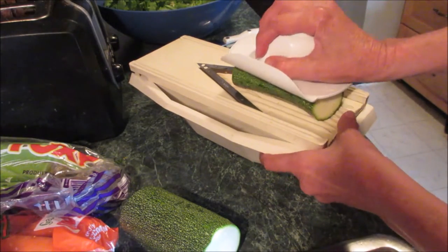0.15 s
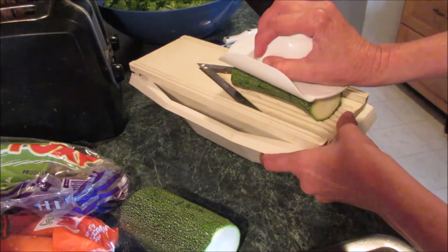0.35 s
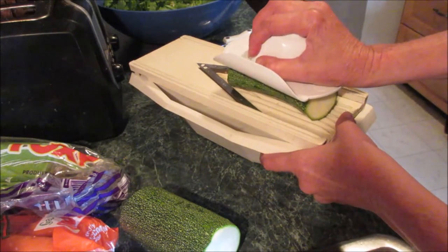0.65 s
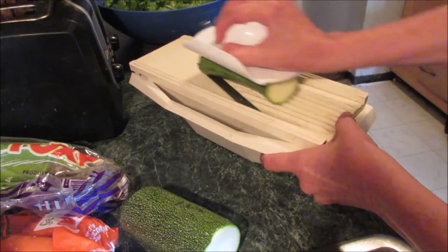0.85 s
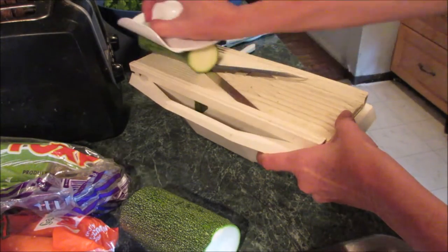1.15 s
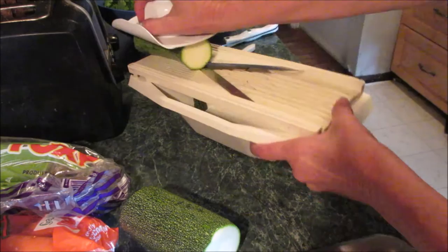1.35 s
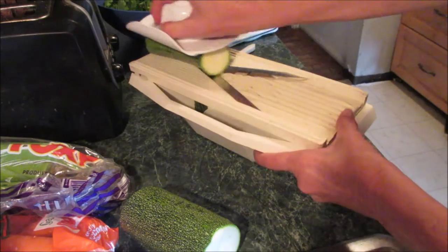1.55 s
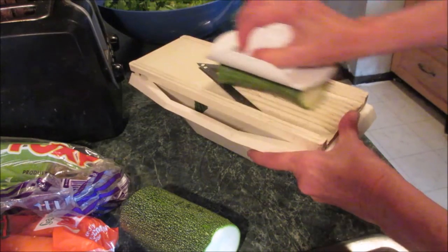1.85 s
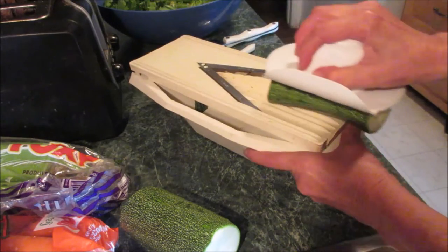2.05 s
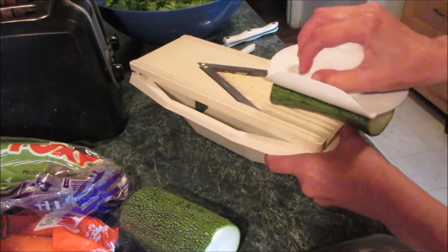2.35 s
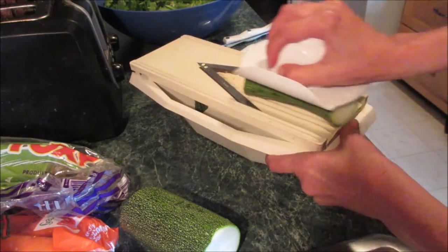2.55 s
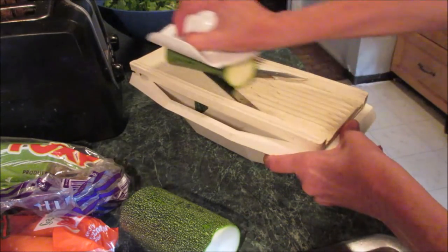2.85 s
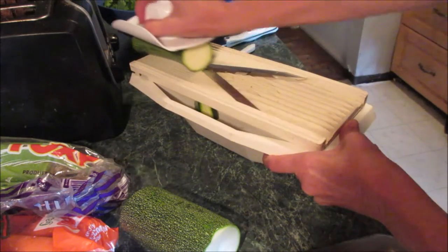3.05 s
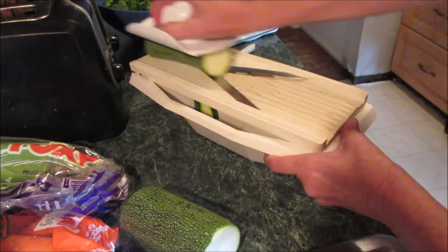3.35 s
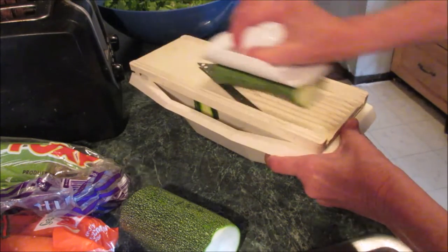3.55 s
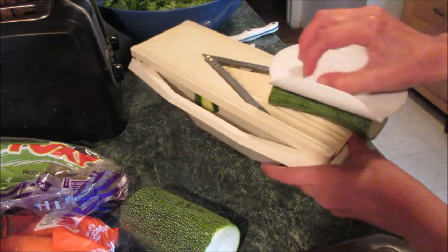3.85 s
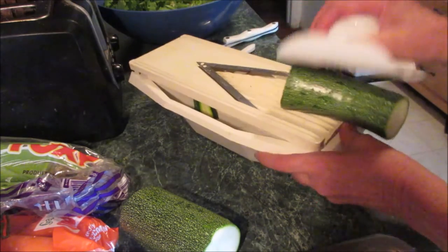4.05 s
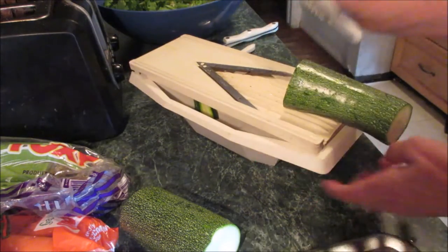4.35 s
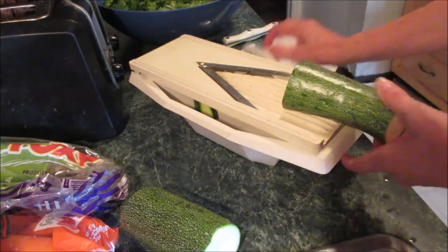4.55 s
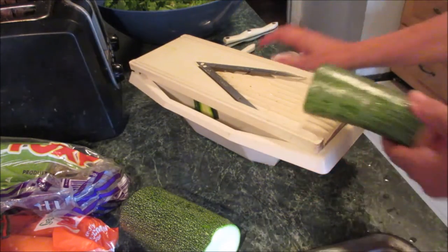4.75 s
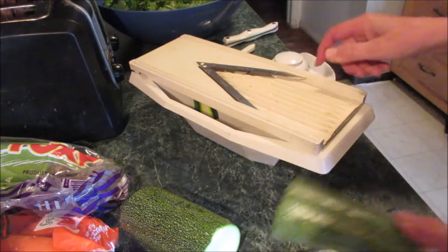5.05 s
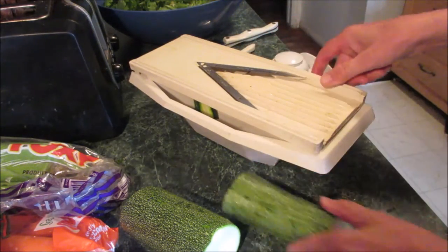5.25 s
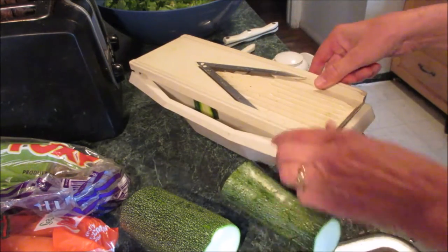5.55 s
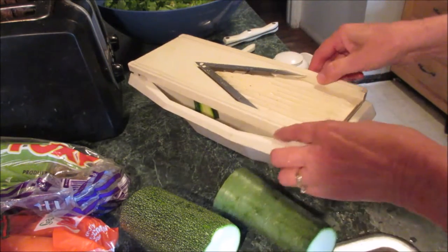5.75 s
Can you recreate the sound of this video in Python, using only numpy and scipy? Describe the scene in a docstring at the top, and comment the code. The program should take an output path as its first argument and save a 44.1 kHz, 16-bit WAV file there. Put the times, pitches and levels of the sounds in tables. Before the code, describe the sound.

Moist, raspy strokes slide over a ribbed slicer, with brief crackles, small squeaks and woody double knocks. After about four seconds comes the loudest clunk, then a hollow plastic rattle as the holder is put down. Quiet bumps and rubs end it. Close mono recording, short kitchen reverberation, low hum and room air beneath.

```python
"""A zucchini in a plastic food holder goes to and fro over a mandoline slicer on a kitchen counter.
First wet flesh swishes over the board (resonant friction noise), crunches through the V-blade (crackle bursts)
and knocks the slicer at the turn of a stroke (struck modes plus crack noise), amid short pitched noise puffs.
Then the slicer bumps down, the holder drops on the counter (struck modes) and hands shift things about.
Throughout, a fridge hums (wavering sines) in room air (shaped noise) over a steady faint hiss."""
import sys
import numpy as np
from scipy import signal
from scipy.fft import rfft, irfft
from scipy.io import wavfile

SR = 44100
rng = np.random.default_rng(int(sys.argv[2]) if len(sys.argv) > 2 else 0)


def bounce(signal):
    """Save signal as a 16-bit WAV file at the path given by the first command-line argument."""
    frames = np.transpose(np.atleast_2d(signal))
    limited = np.clip(frames, -1, 1)
    pcm = np.round(limited * 32767).astype(np.int16)
    wavfile.write(sys.argv[1], SR, pcm)


N = 260586
TIME_S = np.arange(N) / SR
DECAY_TIME_S = TIME_S[:SR // 2]   # for blows, bursts and the room tail


def from_db(db):
    """Decibels to gain."""
    return 10 ** (np.asarray(db) / 20)


def rms_one(x):
    """Scale to unit power."""
    return x / np.sqrt(np.mean(x ** 2) + 1e-20)


def attack_one(x):
    """Scale a blow to unit power over its first 8 ms."""
    return x / np.sqrt(np.mean(x[:SR // 125] ** 2) + 1e-20)


def at_hz(points, hz):
    """Read a table on a log-frequency axis."""
    freqs, values = np.transpose(points)
    return np.interp(np.log(np.maximum(hz, 1)), np.log(freqs), values)


def coloured(x, spectrum):
    """Weight a noise by a spectrum; rms 1."""
    hz = np.fft.rfftfreq(len(x), 1 / SR)
    return rms_one(irfft(rfft(x) * from_db(at_hz(spectrum, hz)), len(x)))


def drift(knots_per_s):
    """Random values joined by straight lines; rms 1."""
    knots = rng.standard_normal(4096)
    return rms_one(np.interp(TIME_S * knots_per_s, np.arange(len(knots)), knots))


def resonate(x, hz, width_hz):
    """Two-pole resonance, gain 1 on top."""
    r = np.exp(-np.pi * width_hz / SR)
    zeros = np.array([1, 0, -1]) * (1 - r * r) / 2
    poles = [1, -2 * r * np.cos(2 * np.pi * hz / SR), r * r]
    return signal.lfilter(zeros, poles, x)


def soften(x, hz):
    """Second-order low-pass: a longer contact takes the top off a blow."""
    return signal.sosfilt(signal.butter(2, min(hz, SR / 2 - 1), fs=SR, output="sos"), x)


def high_pass(x, hz, order):
    """Butterworth low cut."""
    return signal.sosfilt(signal.butter(order, hz, "high", fs=SR, output="sos"), x)


def add(out, s, sound):
    """Mix a sound in at time s."""
    start = int(s * SR)
    out[start:start + len(sound)] += sound[:N - start]


STROKE_SAG_DB_PER_S = 22   # the arm slows as the stroke goes on


def motion(table):
    """Strength of a set of slides: each swells, holds while slowly sagging, and fades."""
    power = np.zeros(N)
    for s, hold_s, db, swell_s, fade_s in table:
        before_s = np.minimum(TIME_S - s, 0)
        after_s = np.maximum(TIME_S - s - hold_s, 0)
        ramps = np.exp(before_s / swell_s - after_s / fade_s)
        sagging_db = db - STROKE_SAG_DB_PER_S * np.clip(TIME_S - s, 0, hold_s)
        power += (ramps * from_db(sagging_db)) ** 2
    return np.sqrt(power)


def grains(per_s, spread_db, smooth):
    """Tiny slips and bursting cells of uneven size over a smooth film of juice."""
    sizes = from_db(spread_db * np.minimum(rng.exponential(1, N), 4)) * rng.choice([-1, 1], N)
    slips = rms_one(sizes * (rng.random(N) < per_s / SR))
    return rms_one(slips + smooth * rng.standard_normal(N))


def through(x, resonances, patchy_db):
    """Parallel resonances, each swelling and fading as the contact moves over it; rms 1."""
    total = np.zeros(N)
    for k, (hz, width_hz, db) in enumerate(resonances):
        gain = from_db(db + patchy_db * drift(knots_per_s=45))
        total += gain * resonate(x, hz, width_hz) * (-1) ** k   # alternate polarity
    return rms_one(total)


# wet zucchini over the board: (t at full speed/s, hold/s, effort level/dB, swell/s, fade/s)
STROKES = [(.28, 0.11, -66.5, 0.21, 0.17), (.98, 0.19, -45, .1, 0.081), (1.66, 0.46, -56, 0.11, 0.25),
           (2.88, 0.09, -42, 0.11, 0.11), (3.365, 0.29, -48, 0.044, 0.091)]
# dry rubs of hands, holder and peel: (t/s, hold/s, effort level/dB, swell/s, fade/s)
RUBS = [(.84, 0.046, -54, 0.052, 0.024), (1.225, 0.048, -56.5, .01, .04),
        (1.865, .035, -48, 0.0075, 0.0085), (1.96, 0.012, -49.5, 0.021, 0.0097),
        (2.07, .03, -60.5, .02, 0.085), (2.53, 0.069, -58.5, 0.06, 0.041), (3.345, 0.055, -47, 0.012, .015),
        (3.9, 0.23, -62.5, 0.27, 0.067), (4.38, 0.053, -53, 0.045, 0.051), (5.745, .015, -53, 0.14, .025)]
# resonances of the rubbed board: (f/Hz, width/Hz, relative level/dB)
BOARD = [(104, 24.6, 8.5), (245.5, 46, 2), (399, 31, 5), (502, 125, 0.5), (703, 218, 2), (1078, 165, 0),
         (1510, 960, -12.5)]
# narrow resonances of blade and frame: (f/Hz, width/Hz, relative level/dB)
BLADE = [(2304, 110, 3.5), (3260, 130, -0.5), (4900, 320, 3), (7340, 400, -0.5)]
# spectrum of the friction hiss: (f/Hz, relative level/dB)
HISS = [(700, -22), (1300, -3), (2300, 3.5), (3200, 1), (4600, 0.5), (6000, -8.5), (8000, -8), (15000, -25)]
# spectrum of the wet top sheen: (f/Hz, relative level/dB)
SHEEN = [(3500, -48), (5500, -1.5), (7300, -3.5), (9000, -1.5), (12000, -0.5), (15000, -8.5)]
FULL_DB, FLOOR_DB = -43, -69   # effort level taken as 1; steady faint hiss under everything
BOARD_DB, BOARD_FOLLOWS = -45.5, 0.64   # board level at effort 1; its share of the swing in dB
HISS_DB, BLADE_DB = -3.5, -8   # all hiss re effort level; blade within it
SHEEN_DB, SHEEN_FOLLOWS = -6, 1.16   # within the hiss at effort 1; follows wet strokes and floor
JUDDER_DB, JUDDER_KNOTS_PER_S = 1.4, 28   # the grip catches and eases
RASP_DB, RASP_KNOTS_PER_S = 1.64, 180   # the skin catches on the ribs of the board


def sliding():
    """Friction shakes board and blade and hisses at the wet contact; wet and dry effort share one flutter."""
    judder = from_db(JUDDER_DB * drift(JUDDER_KNOTS_PER_S) - FULL_DB)
    wet = judder * np.hypot(motion(STROKES), from_db(FLOOR_DB))
    effort = np.hypot(wet, judder * motion(RUBS))
    friction = grains(per_s=5000, spread_db=3, smooth=.8)
    board = rms_one(soften(through(friction, BOARD, patchy_db=2.5), hz=2500))
    blade = through(rng.standard_normal(N), BLADE, patchy_db=5)
    rasp = effort * from_db(RASP_DB * drift(RASP_KNOTS_PER_S)) * coloured(friction, HISS)
    sheen = from_db(SHEEN_DB) * wet ** SHEEN_FOLLOWS * coloured(friction, SHEEN)
    hiss = rasp + from_db(BLADE_DB) * wet * blade + sheen
    return from_db(BOARD_DB) * effort ** BOARD_FOLLOWS * board + from_db(FULL_DB + HISS_DB) * hiss


# fibres tear and juice is squeezed out: (t/s, level/dB, decay/s)
SNAPS = [(1.756, -33, 0.0058), (1.782, -41.5, 0.0069), (1.883, -47, 0.012), (2.843, -35, 0.0049),
         (2.853, -36.5, 0.013), (2.877, -36, 0.014), (2.893, -36.5, 0.014), (3.625, -44, 0.0082),
         (5.434, -52, 0.011)]
# spectrum of the crackle: (f/Hz, relative level/dB)
SNAP = [(600, 2.5), (2000, 1), (4500, 10), (8000, 10.5), (11000, 6.5), (15000, 5)]
SNAP_RISE_SHARE = .33   # rise time / decay time


def snaps():
    """Tearing flesh lets go a quick burst of bright crackle."""
    burst = np.zeros(N)
    for s, db, decay_s in SNAPS:
        rise_s = SNAP_RISE_SHARE * decay_s
        envelope = np.minimum(DECAY_TIME_S / rise_s, np.exp((rise_s - DECAY_TIME_S) / decay_s))
        add(burst, s, from_db(db) * envelope)
    return burst * coloured(grains(per_s=8000, spread_db=2, smooth=.5), SNAP)


# short pitched noise puffs, some squeaks, some bright or nasal colour within the knocks:
# (t of peak/s, Gaussian sigma/s, f/Hz, level/dB)
PUFFS = [(1.034, 0.01, 4530, -41.5), (1.153, 0.021, 2260, -48), (1.506, 0.0017, 2500, -38.5),
         (1.522, 0.0029, 2960, -42.5), (1.9, 0.006, 670, -44.5), (2.857, 0.0074, 2270, -42.5),
         (3.304, 0.0037, 4270, -45.5), (3.462, 0.0051, 4300, -47), (3.744, .002, 2870, -43.5),
         (4.107, 0.0062, 3960, -29.5), (4.133, 0.0039, 1940, -24), (5.76, 0.017, 700, -47.5)]
PUFF_WIDTH_SHARE = 0.3   # width of each resonance / pitch


def pitched_puffs():
    """Noise through two equal resonances in series, under a brief Gaussian swell."""
    out = np.zeros(N)
    for s, sigma_s, hz, db in PUFFS:
        width_hz = PUFF_WIDTH_SHARE * hz
        once = resonate(rng.standard_normal(N), hz, width_hz)
        tone = resonate(once, hz, width_hz)
        out += from_db(db) * rms_one(tone) * np.exp(-.5 * ((TIME_S - s) / sigma_s) ** 2)
    return out


def struck(modes, place, shape_db):
    """Damped sines; each mode's level depends on how near its belly or node the blow lands."""
    hz, db, t60_s = np.transpose(modes)[:, :, None]
    number = np.arange(1, len(hz) + 1)[:, None]
    placed_db = shape_db * np.cos(2 * np.pi * number * place)
    gain = from_db(db + placed_db + rng.standard_normal(hz.shape))
    decay = from_db(-60 * DECAY_TIME_S / t60_s)
    return (gain * decay * np.sin(2 * np.pi * hz * DECAY_TIME_S)).sum(0)


# modes of the counter: (f/Hz, relative level/dB, t60/s)
COUNTER = [(108.4, -3, 0.12), (147, 2, 0.035), (216, -3, 0.075), (309, -12.5, 0.098)]


def thump(top_hz, bottom_hz=85):
    """The counter's dull answer to a push; its slowest motion radiates little."""
    push = soften(struck(COUNTER, place=0, shape_db=0), top_hz)
    return attack_one(high_pass(push, bottom_hz, order=3))


# spectrum of the dense high modes, before contact softening: (f/Hz, relative level/dB)
CRACK = [(300, 6.5), (700, 10), (1200, 9.5), (2000, 3), (3400, 6), (4400, -4), (7000, -3.5), (10000, -8.5),
         (15000, -13)]
CRACK_RISE_S = 0.00031   # soft onset of the crack
# crack re ring at this hardness; a harder contact cracks more
HARD_HZ, CRACK_DB, CRACK_DB_PER_OCTAVE = 3070, -9, 9.5


def blows(table, modes, shape_db, crack_s, rattle_db, rattle_s, free_share, grip_s):
    """Each blow: a thump through the counter, the object's modes, and a crack of dense short-lived high modes."""
    out = np.zeros(N)
    rattle = from_db(rattle_db) * np.exp(-DECAY_TIME_S / rattle_s)
    dying = np.exp(-DECAY_TIME_S / crack_s) + rattle
    crack_envelope = dying * (1 - np.exp(-DECAY_TIME_S / CRACK_RISE_S))
    damping = free_share + np.exp(-DECAY_TIME_S / grip_s)   # the contact soaks up part of the ring at once
    for s, thump_db, ring_db, contact_hz, place in table:
        crack_db = ring_db + CRACK_DB + CRACK_DB_PER_OCTAVE * np.log2(contact_hz / HARD_HZ)
        ring = soften(struck(modes, place, shape_db) * damping, contact_hz)
        noise = coloured(rng.standard_normal(len(DECAY_TIME_S)), CRACK)
        crack = soften(noise * crack_envelope, 2.46 * contact_hz)
        clack = from_db(ring_db) * attack_one(ring) + from_db(crack_db) * attack_one(crack)
        clack = high_pass(clack, 170, order=2)   # too small to radiate bass
        push_hz = 130 + 1300 * from_db(thump_db)   # a harder push is stiffer and so reaches higher
        add(out, s, clack + from_db(thump_db) * thump(push_hz))
    return out


# blows on the slicer: (t/s, thump level/dB, ring level before low cut/dB, contact hardness f/Hz,
#                       place [end 0 to middle 0.5])
SLICER_BLOWS = [(1.12, -67, -37.5, 1300, 0.22), (1.134, -53, -42, 1290, 0.25),
                (1.221, -66, -44.5, 1500, 0.47), (1.505, -34, -25.5, 1900, .5), (1.5095, -53, -32, 980, .5),
                (1.517, -29, -28, 3000, .5), (2.002, -57, -42, 4860, 0.12), (2.971, -55, -37, 2000, 0.43),
                (3.202, -63, -48.5, 1200, 0.29), (3.293, -31.5, -25.5, 2100, 0.23),
                (3.302, -26.5, -27.5, 3170, 0.32), (3.385, -45, -38, 1720, 0.38),
                (3.985, -68, -42.5, 2400, 0.19), (4.091, -37, -29, 2220, 0.14),
                (4.094, -13, -33.5, 1800, 0.11), (4.099, -48, -33.5, 7050, 0.18),
                (4.107, -52, -26.5, 4200, 0.14), (4.128, -48, -24.5, 6160, 0.206),
                (4.1315, -32, -16.5, 3340, 0.162), (4.158, -60, -31, 3000, 0.17),
                (4.191, -64, -47, 2500, .25)]
# modes of the slicer: (f/Hz, relative level/dB, free t60/s)
SLICER = [(215, -4, 0.072), (250.7, 1.5, 0.11), (417, -4, 0.046), (481, 7, 0.047), (600, -2.5, 0.14),
          (694.5, 9, 0.058), (756, -6, .06), (942, -11, 0.13), (1220, -22, 0.13), (1620, -27, 0.066),
          (1936, 2.5, 0.039), (2260, -4, 0.034), (2570, -27, .08), (3270, -13, 0.11)]


def slicer_knocks():
    """Blows ring the slicer's modes and thump the counter under it."""
    return blows(SLICER_BLOWS, SLICER, shape_db=10, crack_s=0.0071, rattle_db=-26, rattle_s=0.0075,
                 free_share=0.83, grip_s=0.012)


# blows on the food holder: (t/s, thump level/dB, ring level before low cut/dB, contact hardness f/Hz,
#                            place [end 0, middle 0.5])
HOLDER_BLOWS = [(4.626, -70, -39.5, 3620, 0.355), (4.672, -67, -53, 5000, 0.79),
                (4.7055, -32, -29, 7500, 0.095), (4.731, -31.5, -18.5, 3760, 0.263),
                (4.7415, -45, -16.5, 4160, 0.213), (4.775, -33.5, -31, 1400, 0.034),
                (4.839, -62, -39.5, 1200, 0.29), (5.868, -70, -46, 3760, 0.163)]
# modes of the plastic holder: (f/Hz, relative level/dB, free t60/s)
HOLDER = [(293, 0, 0.16), (364, -13, 0.079), (505, -5, 0.19), (600, 5, 0.077), (638, 8.5, 0.15),
          (725, 0, 0.13), (1110, -14, 0.074), (1285, 0, 0.061), (1567, -3, 0.077), (1715, -2.5, 0.076),
          (1796, 2, 0.036), (2760, -7.5, 0.098), (3140, -19, 0.092), (3350, -18, 0.053), (3710, -11, 0.063)]


def holder_drop():
    """The dropped holder rings its plastic modes, with a longer rattle than the slicer."""
    return blows(HOLDER_BLOWS, HOLDER, shape_db=7.5, crack_s=0.0051, rattle_db=-16, rattle_s=0.044,
                 free_share=0.83, grip_s=0.0059)


# hands and vegetable bump on slicer and counter: (t/s, level/dB)
BUMPS = [(0.851, -43.5), (2.014, -43), (3.05, -41), (3.631, -47), (5.28, -46.5), (5.325, -48), (5.376, -52),
         (5.445, -50), (5.47, -44), (5.503, -46), (5.789, -41.5)]


def bumps():
    """Soft thuds of hands and vegetable excite the low counter modes."""
    out = np.zeros(N)
    for s, db in BUMPS:
        add(out, s, from_db(db) * thump(top_hz=119, bottom_hz=60))
    return out


# decay of the kitchen: (f/Hz, t60/s)
KITCHEN = [(100, 0.24), (600, 0.33), (3000, 0.25), (8000, 0.18), (15000, 0.11)]


def kitchen(x, first_echo_s, build_s):
    """Diffuse reflections that build up and die away at a rate set by frequency."""
    noise = rng.standard_normal(len(DECAY_TIME_S))
    hz, t, cells = signal.stft(noise, SR, nperseg=256)
    decay = from_db(-60 * t / at_hz(KITCHEN, hz)[:, None])
    tail = signal.istft(cells * decay, SR)[1][:len(DECAY_TIME_S)]
    tail = tail * np.clip((DECAY_TIME_S - first_echo_s) / build_s, 0, 1)
    return signal.fftconvolve(x, tail / np.sqrt(np.sum(tail ** 2)))[:N]


# fridge tones: (f/Hz, rms level/dB)
HUM = [(59.5, -86), (248, -70), (355.3, -66), (387.6, -71), (925, -75)]
# spectrum of the room air: (f/Hz, relative level/dB)
AIR = [(13, -52), (22, -8), (149, -9), (212, -12), (250, -13.5), (286, -14), (356, -8), (551, -15),
       (598, -29), (978, -16), (1180, -20), (1740, -18.5), (2040, -20), (5460, -29.5), (15000, -40.5)]
AIR_DB = -58.5


def background():
    """Steady room air and fridge tones wavering in level and phase."""
    hum = np.zeros(N)
    for hz, db in HUM:
        gain = from_db(db + 0.5 * drift(knots_per_s=1.7)) * np.sqrt(2)
        hum += gain * np.sin(2 * np.pi * hz * TIME_S + .5 * drift(knots_per_s=6.6))
    return hum + from_db(AIR_DB) * coloured(rng.standard_normal(N), AIR)


def scene():
    """Slicer, holder and vegetable close by, in the kitchen."""
    near = sliding() + snaps() + pitched_puffs() + slicer_knocks() + holder_drop() + bumps()
    room = from_db(-12.5) * kitchen(near, first_echo_s=0.00053, build_s=0.0049)
    return (near + room + background())[None]


CUTOFF_HZ = 15300
DUCK_ABOVE_DB, DUCK_ATTACK_S, DUCK_RELEASE_DB_PER_S = -10, 0.051, 14   # the recorder's gain control


def record(dry):
    """The gain sinks after the loudest knocks and creeps back; the top is cut steeply."""
    over_db = np.maximum(20 * np.log10(np.abs(dry) + 1e-9) - DUCK_ABOVE_DB, 0)
    release_db = DUCK_RELEASE_DB_PER_S * TIME_S
    held_db = np.maximum.accumulate(over_db + release_db, axis=-1) - release_db
    lag = np.exp(-1 / (DUCK_ATTACK_S * SR))
    duck_db = signal.lfilter([1 - lag], [1, -lag], held_db)
    ducked = dry * from_db(-duck_db)
    return signal.sosfilt(signal.ellip(12, .1, 80, CUTOFF_HZ, fs=SR, output="sos"), ducked)


dry = scene()
out = record(dry)
bounce(out)
```